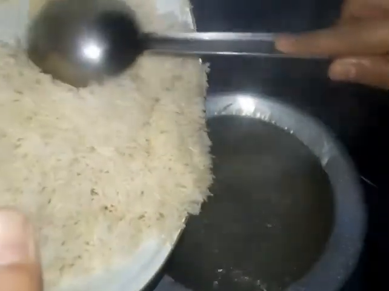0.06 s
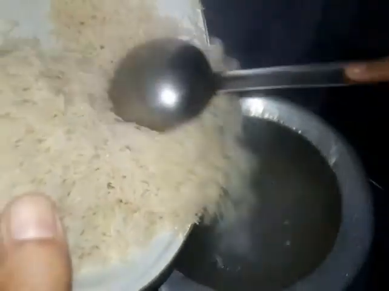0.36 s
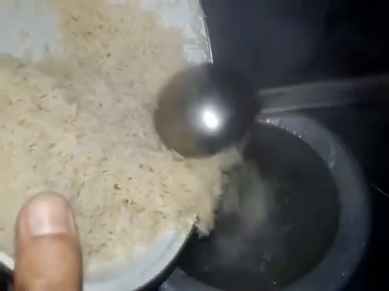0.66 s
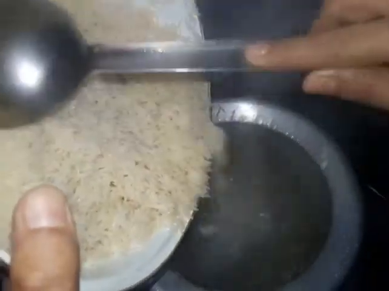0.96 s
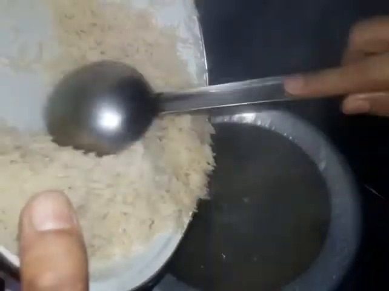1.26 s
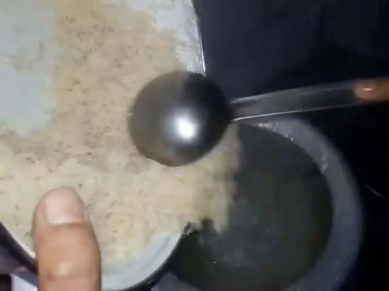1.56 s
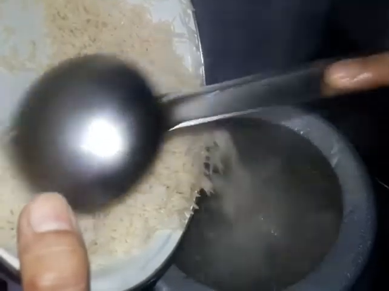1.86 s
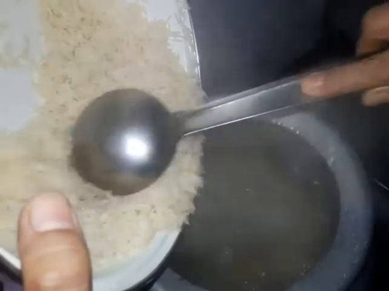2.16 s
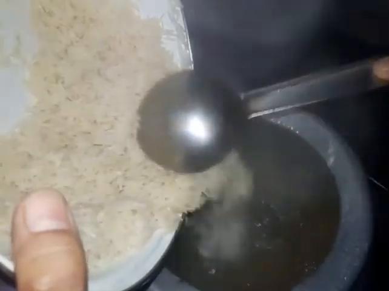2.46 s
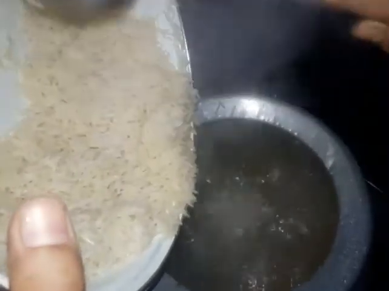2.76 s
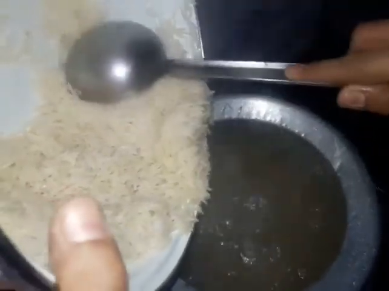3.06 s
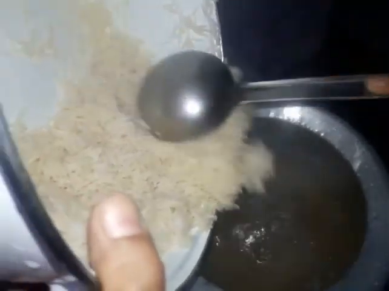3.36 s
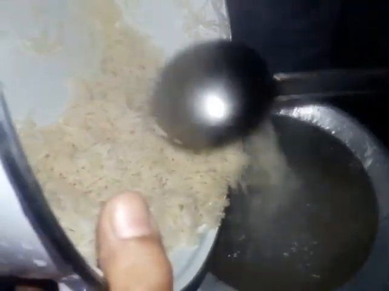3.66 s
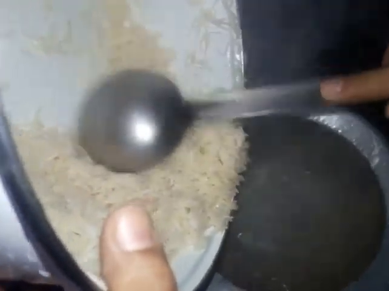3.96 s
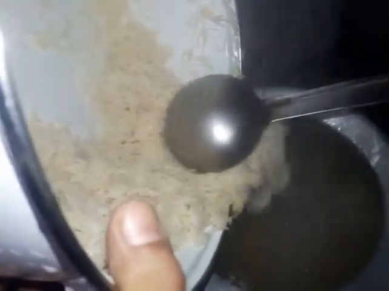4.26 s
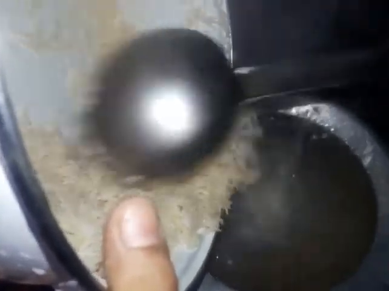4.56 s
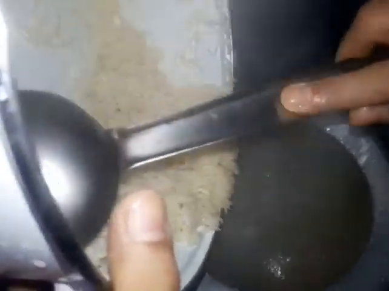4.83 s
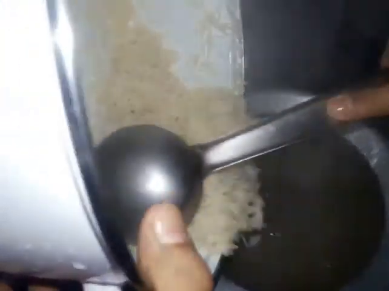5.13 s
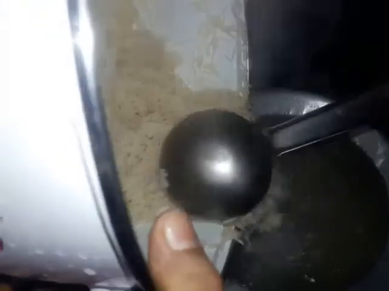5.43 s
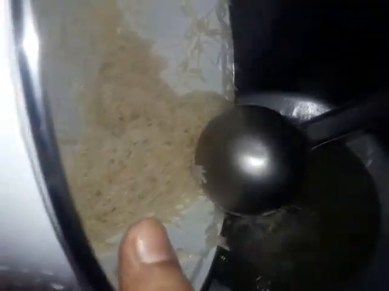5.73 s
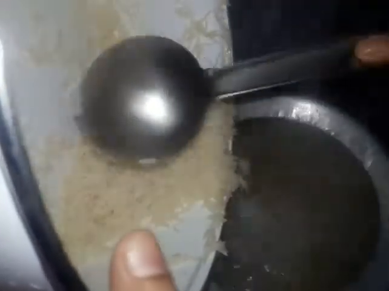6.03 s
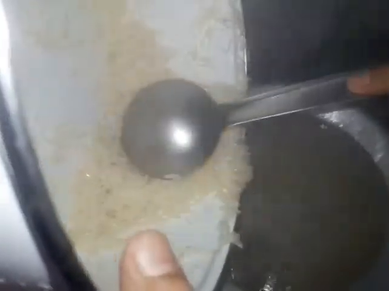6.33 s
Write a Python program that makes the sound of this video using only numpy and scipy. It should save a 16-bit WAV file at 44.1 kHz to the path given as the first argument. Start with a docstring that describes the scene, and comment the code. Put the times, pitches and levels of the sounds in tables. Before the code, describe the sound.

A steel ladle scrapes wet rice off a metal bowl, with crunchy squelches and a few clinks, over a simmering pot.

```python
"""A steel ladle pushes soaked rice off a metal bowl, stroke by stroke, into a pot of boiling water.
The wet grains crunch and squelch as they rub together. The ladle catches on them and slips free,
squeaks on bare steel, and knocks the bowl so that both ring briefly. Clumps plop into the pot.
The pot simmers steadily throughout, and the walls of a small kitchen add a short echo to the work."""
import sys
import numpy as np
from scipy import signal
from scipy.fft import rfft, irfft
from scipy.io import wavfile

SR = 44100
rng = np.random.default_rng(int(sys.argv[2]) if len(sys.argv) > 2 else 0)


def master(y):
    """Save y as 16-bit WAV."""
    cut = np.clip(np.atleast_2d(y).T, -1, 1)
    pcm = np.round(cut * 32767)  # scale
    wavfile.write(sys.argv[1], SR, pcm.astype(np.int16))


N = 281799
T = np.arange(N) / SR

# The tone of the steady simmer and burner hiss as coloured by the microphone.
# Each row: frequency in Hz, relative level in dB.
SIMMER_TONE = [(25, 3.5), (55, -12), (120, -3), (160, -6.5), (340, 0), (520, -5), (800, -4), (1300, -7),
               (3300, -9.5), (4700, -17.5), (7300, -11.5), (8200, -21.5), (9300, -20.5), (13000, -29.5),
               (16000, -42)]
# The ladle leans into the rice, drags and eases off. Each row: start, end, fade-in and fade-out
# in seconds, level in dB, brightness (treble compared with the rest) in dB.
STROKES = [(0.384, 1.285, 0.072, 0.29, -35.5, -7), (1.546, 2.233, .2, 0.28, -37, -9),
           (2.41, 2.853, 0.15, 0.13, -36.5, -9), (2.863, 3.032, 0.087, 0.057, -30, -4),
           (3.39, 3.961, 0.14, 0.045, -39.5, -9.5), (4.373, 4.83, 0.055, 0.16, -41, -6),
           (5.202, 6.174, 0.15, .27, -40, -7)]
# A clump gives way. Each row: start and length in seconds, level in dB, brightness in dB.
CLUMPS = [(0.399, 0.027, -37.5, -3), (0.467, 0.057, -29.5, 12), (0.543, 0.031, -32.5, 2),
          (0.618, 0.022, -28.5, 12), (0.67, 0.038, -29.5, 1), (0.765, 0.026, -28, -2),
          (0.912, 0.027, -28, -8), (1.07, 0.018, -28, -3), (1.164, 0.042, -35, -3),
          (1.605, 0.022, -37.5, 7), (1.681, 0.017, -32.5, 0), (1.733, 0.046, -27.5, 0),
          (1.827, 0.053, -31.5, 13), (1.88, 0.049, -25, -0.5), (1.93, .05, -32, -4),
          (2.029, 0.013, -32, -6), (2.073, .012, -42, -4), (2.425, 0.018, -41, 1), (2.519, 0.027, -30, -3),
          (2.57, 0.025, -32, -1), (2.646, 0.04, -34, 1), (2.719, .025, -26, -2), (3.416, 0.025, -36, -4),
          (3.5, 0.038, -31.5, 3), (3.57, 0.026, -32.5, 11), (3.656, 0.021, -30, -1),
          (3.685, 0.068, -30.5, -2), (3.801, 0.082, -30.5, -8), (4.402, 0.033, -34.5, 2),
          (4.447, 0.047, -32, 2), (4.539, 0.036, -29.5, -5), (4.594, 0.035, -27.5, -2),
          (4.706, 0.048, -35, -3), (4.832, 0.032, -39.5, -14), (5.359, .018, -38, 0),
          (5.388, 0.042, -36, 21), (5.438, 0.026, -32.5, -4), (5.514, 0.034, -30, -3),
          (5.632, 0.055, -33.5, -7), (5.696, 0.054, -31.5, 4), (5.762, 0.041, -30.5, -8),
          (5.881, 0.027, -28.5, -5), (5.994, .014, -32.5, -8), (6.085, 0.04, -35.5, 7)]
# The tone of the rice crunch as coloured by the microphone and room.
# Each row: frequency in Hz, relative level in dB.
CRUNCH_TONE = [(300, -16), (900, -13), (1850, -22), (2300, -7), (2750, -10), (3350, 1.5), (4900, -10.5),
               (6100, -2), (7200, 1.5), (8160, -8), (9200, -1), (10700, -7.5), (11900, -3), (13000, -13.5),
               (14500, -6), (16000, -19.5)]
# How much rice goes over the rim. Each row: time in seconds, plop level in dB relative to the push.
POUR_SHARE = [(0.4, -19.5), (0.7, -12.5), (1.1, -25.5), (1.7, -18), (1.9, -15.5), (2.5, -24), (2.95, -41),
              (3.7, -33), (3.9, -13), (4.5, -27.5), (5.8, -22)]
# The hollow tone of the pot. Each row: frequency in Hz, relative level in dB.
PLOP_TONE = [(200, -25.5), (480, 3), (610, 4.5), (760, -6.0), (1200, -4.0), (3000, 3)]
# The ladle catches on grains and jumps free.
# Each row: time in seconds, relative level in dB, brightness (higher is brighter).
SLIPS = [(0.436, -27, 3), (0.502, -15.5, 14), (0.5835, -19, 2), (0.692, -24, 14), (0.742, -18.5, -3),
         (0.7736, -17.5, 2), (0.781, -21, 10), (0.8046, -20, 1), (0.88, -22, -11), (0.9496, -23, -2),
         (0.9868, -25, 7), (1.0267, -24, -8), (1.044, -24.5, -5.5), (1.2397, -31, -7), (1.5735, -33, -11),
         (1.696, -33, -6), (1.751, -18, 15), (1.8209, -23, 9), (1.895, -20, 6), (2.0397, -23.5, -3),
         (2.467, -33.5, -15), (2.582, -21.5, 14), (2.6699, -15.5, -9), (2.8101, -28.5, -12),
         (2.817, -32, 5), (3.4055, -29.5, -11), (3.5774, -24, -9), (3.5914, -22.5, 13), (3.712, -22, -1),
         (3.81, -22, 4), (3.864, -23, 11), (3.8835, -24, 12), (4.4878, -26.5, -1), (4.556, -18.5, -0.5),
         (4.5906, -18, -1), (4.673, -25, 2), (4.7076, -23.5, -1), (5.3658, -18, -2.5), (5.4015, -25, 8),
         (5.5275, -21, -6), (5.7305, -16, 17.5), (5.7582, -17.5, -2), (5.7829, -15, -9), (5.8934, -15, -6),
         (5.961, -26.5, -8), (6.0797, -29, -23), (6.1127, -23, 2)]
# Bare steel squeaks on the bowl. Each row: start and length in seconds, pitch in Hz, level in dB,
# level of the octave above in dB relative to the main note.
SQUEAKS = [(0.472, 0.052, 3694, -30.5, -11), (0.533, 0.041, 3665, -32.5, 4), (2.88, 0.072, 3014, -38, -3),
           (2.937, 0.051, 6100, -33, -8)]
# Air pockets close under the ladle.
# Each row: start and length in seconds, first and last pitch in Hz, level in dB.
SQUELCHES = [(0.578, 0.023, 2284, 2370, -43), (0.767, 0.018, 2265, 2436, -37),
             (1.017, 0.028, 2230, 2320, -42), (1.81, 0.056, 2077, 2200, -49),
             (1.859, 0.0546, 2185, 2470, -37), (2.654, .028, 2242, 2440, -37.5),
             (3.501, 0.0069, 3560, 3900, -30), (3.569, 0.028, 2164, 2330, -43.5),
             (3.831, 0.0083, 2260, 2620, -29.5), (5.528, 0.0067, 3310, 3880, -26.5),
             (6.078, 0.0056, 2970, 3480, -27)]
# The ladle hits the bowl. Each row: start in seconds, bowl boom in dB, steel clink in dB,
# treble cutoff in Hz (higher for a harder hit), skid level in dB.
KNOCKS = [(1.0828, -21, -16, 15600, -38.5), (1.176, -34.5, -39, 6000, -63), (2.887, -41, -19, 8400, -67),
          (3.9377, -18, -36, 790, -51), (3.9422, -22.5, -13.5, 10400, -41), (4.058, -43, -40, 16000, -71),
          (4.97, -30, -27, 7700, -49.5), (6.2079, -22, -60, 465, -55), (6.2272, -19.5, -18, 4400, -51)]
# The ringing notes (modes) of the hand-held bowl, damped by its load.
# Each row: pitch in Hz, relative level in dB, seconds to fade by 60 dB.
BOWL_MODES = [(342, 2.5, 0.055), (462, -1.5, 0.042), (580, -6.5, 0.045), (750, 3, 0.032),
              (832, -4.5, 0.047), (874, 0.5, 0.041), (1026, -5.5, 0.026), (1320, -8, 0.025),
              (1632, -3, 0.0224), (2117, -11.5, 0.053)]
# The ringing notes of the ladle, pressed against the bowl.
# Each row: pitch in Hz, relative level in dB, seconds to fade by 60 dB (ring() may shorten this).
LADLE_MODES = [(2755, 1, 0.037), (2910, 5, 0.034), (3580, 0.5, 0.026), (3900, -5, 0.026), (4190, 1, 0.026),
               (4370, -14, 0.0124), (5640, 5.5, 0.035), (6130, 11.5, 0.022), (6610, 4.5, 0.015),
               (7230, 0.5, 0.015), (7410, 10.5, 0.014), (8970, -0.5, 0.012), (9560, 11.5, 0.0095),
               (11950, 10.5, 0.0074), (14000, 6, .006)]


def undb(db):
    """Turn decibels into a number to multiply a sound by."""
    return 10 ** (np.asarray(db) / 20)


def unit(x):
    """Scale a sound so that its average strength (rms) is 1."""
    return x / np.sqrt(np.mean(x ** 2) + 1e-18)


def add(track, start_s, sound):
    """Mix a sound into a track at the given time."""
    i = max(int(start_s * SR), 0)
    track[i:i + len(sound)] += sound[:max(N - i, 0)]


def lowpass(x, hz, order=2):
    """Soften everything above hz."""
    return signal.sosfilt(signal.butter(order, min(hz, .45 * SR), fs=SR, output="sos"), x)


def highpass(x, hz, order=2):
    """Soften everything below hz."""
    return signal.sosfilt(signal.butter(order, hz, "high", fs=SR, output="sos"), x)


def colour(x, tone):
    """Filter a sound to follow a tone table of frequencies and levels."""
    hz, db = np.transpose(tone)
    size = 4096
    f = np.maximum(np.arange(size // 2 + 1) * SR / size, 1)
    gain = undb(np.interp(np.log(f), np.log(hz), db))
    # these steps make the filter ring only after each tick, never before it
    cepstrum = irfft(np.log(gain))
    cepstrum[1:size // 2] *= 2
    cepstrum[size // 2 + 1:] = 0
    response = irfft(np.exp(rfft(cepstrum)))
    return signal.fftconvolve(x, response)[:len(x)]


def brighten(x, db, split_hz=6000):
    """Tip the balance like a see-saw: positive db gives more above the split and less below."""
    f = np.arange(len(x) // 2 + 1) * SR / len(x)
    low = irfft(rfft(x) / (1 + (f / split_hz) ** 4), len(x))
    return (low + undb(db) * (x - low)) * np.sqrt(2 / (1 + undb(2 * db)))


def wander(per_s):
    """A random curve, mostly between -1 and 1, that takes a new course per_s times a second."""
    points = rng.standard_normal(int(N / SR * per_s) + 2)
    return np.interp(T * per_s, np.arange(len(points)), points)


def ticks(per_s, spread_db):
    """Tiny clicks of uneven size at random times."""
    happens = rng.random(N) < per_s / SR
    return happens * rng.choice([-1, 1], N) * undb(spread_db * rng.standard_normal(N))


def simmer(level_db=-46.5):
    """The burner and boiling water rush steadily, with a fine fizz of collapsing steam bubbles."""
    rush = rng.standard_normal(N) * undb(0.32 * wander(17))
    fizz = highpass(unit(ticks(per_s=260, spread_db=3)), 1150, order=1)
    return unit(colour(rush + undb(-9.0) * fizz, SIMMER_TONE)) * undb(level_db)


def strokes(rest_db=-60.0, touch_db=-21.5):
    """Level and brightness of the drag: each stroke swells from a light touch, holds and fades."""
    drag_db, bright_db = np.full(N, rest_db), np.zeros(N)  # between strokes the rice only settles
    for start, end, attack, release, db, tone_db in STROKES:
        on = (T > start) & (T < end)
        contact = np.minimum((T[on] - start) / attack, (end - T[on]) / release)
        drag_db[on] = db + touch_db * (1 - np.minimum(contact, 1))
        bright_db[on] = tone_db
    return drag_db, bright_db


def clumps(drag_db, drag_bright_db, attack_s=0.005, release_s=0.009, sag_db=-3):
    """Level and brightness of the whole push: the drag plus a short surge as each clump breaks."""
    power = undb(2 * drag_db)
    weighted_brightness = power * drag_bright_db
    t = T[:SR // 4]
    for start, length, db, bright_db in CLUMPS:
        rise = np.minimum(t / attack_s, 1)
        sag = undb(sag_db * t / length)
        fade = np.exp(-np.maximum(t - length, 0) / release_s)
        surge = (rise * sag * fade * undb(db)) ** 2
        add(power, start, surge)
        add(weighted_brightness, start, surge * bright_db)
    return 10 * np.log10(power), weighted_brightness / power


def crunch(push_db, bright_db):
    """Grains grind under the ladle in quick, uneven spurts; a harder push breaks more of them."""
    grains = ticks(per_s=9000 * undb(.5 * (push_db + 31.5)), spread_db=2)
    grains /= undb(0.22 * (push_db + 30))  # offsets most of the loudness that extra ticks bring
    spurts = undb(4.0 * wander(260) + 1.95 * wander(70))
    rice = unit(colour(grains * spurts, CRUNCH_TONE))
    return brighten(rice, bright_db + 8.6 * wander(150)) * undb(push_db)


def bubbles(low_hz, octaves, cycles, spread_db, count):
    """A cloud of small bubbles, mostly near the lowest pitch, each gliding up as it rings."""
    out, t = np.zeros(N), T[:1536]
    for when, height, strength in rng.random((count, 3)):
        hz = low_hz * 2 ** (octaves * height ** 2)
        bubble = np.sin(2 * np.pi * hz * t * (1 + 2 * t)) * np.exp(-hz * t / cycles)
        add(out, when * N / SR, bubble * undb(spread_db * strength ** 2))
    return unit(out)


def pouring(push_db, droplet_db=-9):
    """Water films pop between the grains; clumps that go over the rim plop into the hollow pot."""
    droplets = bubbles(low_hz=2700, octaves=2.105, cycles=4.6, spread_db=12, count=2800)
    plops = bubbles(low_hz=565, octaves=1.01, cycles=2.1, spread_db=10.0, count=1400)
    plops = unit(colour(plops, PLOP_TONE))
    share_db = np.interp(T, *np.transpose(POUR_SHARE))
    return (droplets * undb(droplet_db) + plops * undb(share_db)) * undb(push_db)


def slips(rows, slip_s=0.0024, patchy_db=4.5):
    """The ladle jumps free with a tiny burst of noise, whose tone depends on where it caught."""
    out, t = np.zeros(N), T[:2048]
    hz, tone_db = np.transpose(CRUNCH_TONE)
    rise_s = .4 * slip_s
    for when, db, brightness in rows:
        spot_tone = np.column_stack([hz, tone_db + patchy_db * rng.standard_normal(len(hz))])
        burst = rng.standard_normal(len(t)) * t / rise_s * np.exp(-t / rise_s)
        burst = brighten(colour(burst, spot_tone), 1.45 * brightness)
        burst = unit(highpass(burst, 2100, order=1)) * np.sqrt(slip_s / t[-1])
        add(out, when - rise_s, burst * undb(db - 1.33))
    return out


def small_slips(drag_db, per_s=30, above_drag_db=6.5, spread_db=2.5, count=400):
    """The ladle also slips at random moments, more loudly the harder it drags."""
    times = np.cumsum(rng.exponential(1, count)) / per_s
    size, tone = rng.uniform(-1, 1, (count, 2)).T * np.sqrt(3)
    level_db = np.interp(times, T, drag_db) + above_drag_db + spread_db * size
    rows = np.column_stack([times, level_db, 7 * tone])
    return slips(rows[times < T[-1]])


def squeaks(wobble=0.022, flutter_db=1.5):
    """Steel sticks and slides so fast that it sings one brief note, unsteady in pitch and strength."""
    out = np.zeros(N)
    drift, flutter = wobble * wander(350), undb(flutter_db * wander(300))
    for start, length, hz, db, octave_db in SQUEAKS:
        on = (T > start) & (T < start + length)
        phase = 2 * np.pi * np.cumsum(hz * (1 + drift[on])) / SR
        tone = np.sin(phase) + undb(octave_db) * np.sin(2 * phase)
        fades = signal.windows.tukey(len(phase), .5)
        add(out, start, unit(tone * flutter[on] * fades) * undb(db))
    return out


def squelches():
    """Wet grains set an air pocket ringing, and its pitch climbs as it shrinks."""
    out = np.zeros(N)
    drive = 1 + .5 * (wander(260) + 1j * wander(260))  # roughens both strength and pitch
    for start, length, start_hz, end_hz, db in SQUELCHES:
        on = (T > start) & (T < start + length)
        phase = 2 * np.pi * np.cumsum(np.linspace(start_hz, end_hz, on.sum())) / SR
        tone = np.real(drive[on] * np.exp(1j * phase))
        fades = signal.windows.tukey(len(phase), .5)
        add(out, start, unit(tone * fades) * undb(db))
    return out


def ring(modes, scatter_db, detune, max_cycles=90):
    """Struck metal rings with fading notes; each contact point shifts their level and pitch a little."""
    hz, db, fade_s = np.transpose(modes)[:, :, None]
    t = T[:8192]
    size, shift = rng.standard_normal((2, len(modes), 1))
    sign = (-1) ** np.arange(len(modes))[:, None]  # neighbouring modes push the air opposite ways
    waves = sign * np.sin(2 * np.pi * hz * (1 + detune * shift) * t)
    fade_s = np.minimum(fade_s, max_cycles / hz)  # wet rice cuts the ringing short
    return np.sum(waves * undb(db + scatter_db * size - 60 * t / fade_s), axis=0)


def knocks(crack_db=9, crack_s=0.0011, rattle_db=-8, rattle_s=0.036, skid_s=0.11, rasp_db=1):
    """The bowl booms, the ladle clinks, rattles and skids on; rice between them softens the hit."""
    out, t = np.zeros(N), T[:8192]
    attack = t < 0.005
    contact = undb(crack_db) * np.exp(-t / crack_s) + undb(rattle_db) * np.exp(-t / rattle_s)
    skid_fade = np.exp(-(t / skid_s) ** 4)
    for start, boom_db, clink_db, cutoff_hz, skid_db in KNOCKS:
        crack = highpass(contact * rng.standard_normal(len(t)), 1800)
        # a small bowl gives off little bass, and a hard, short hit wakes its lowest note least
        bowl = highpass(ring(BOWL_MODES, scatter_db=0.5, detune=0.025), 170 + 0.02 * cutoff_hz)
        steel = highpass(ring(LADLE_MODES, scatter_db=2.0, detune=0.017), 2000) + crack
        for part, db in (bowl, boom_db), (steel, clink_db):
            part = lowpass(part, cutoff_hz, order=3)
            add(out, start, part * undb(db) / np.std(part[attack]))
        # uneven rubbing keeps the bowl sounding and rasps over the grains
        friction = rng.standard_normal(len(t)) * undb(3.7 * wander(175)[:len(t)])
        groan = unit(signal.fftconvolve(friction, bowl)[:len(t)])
        rasp = unit(lowpass(colour(friction, CRUNCH_TONE), 0.7 * cutoff_hz))
        add(out, start, (groan + undb(rasp_db) * rasp) * skid_fade * undb(skid_db))
    return out


def kitchen(x, delay_s=0.0079, fade_s=0.37, treble_fade_s=0.33, level_db=-12):
    """Hard walls close by give a short, dense echo whose treble fades first."""
    t = T[:SR // 2]
    noise = rng.standard_normal(len(t))
    low = lowpass(noise, 4100, order=1)
    tail = low * undb(-60 * t / fade_s) + 0.5 * (noise - low) * undb(-60 * t / treble_fade_s)
    tail *= t > delay_s
    return signal.fftconvolve(x, tail / np.linalg.norm(tail))[:N] * undb(level_db)


def scene():
    """Everything is straight ahead; only the treble of the scraping spreads a little to the sides."""
    drag_db, drag_bright_db = strokes()
    push_db, bright_db = clumps(drag_db, drag_bright_db)
    pot, hits, splashes = simmer(), knocks(), pouring(push_db)
    scatter = rng.standard_normal(128)
    scraping = crunch(push_db, bright_db) + squeaks() + squelches() + slips(SLIPS) + small_slips(drag_db)
    work = scraping + hits + splashes
    middle = work + kitchen(work) + pot
    side = np.convolve(scraping, scatter / np.linalg.norm(scatter))[:N]
    side = highpass(side, 7000, order=4) * undb(-32)
    return np.array([middle + side, middle - side])


def record(dry, low_hz=74, top_hz=15800, peak=0.85):
    """Thin the bass, flatten any peak that is too loud and cut the highest treble."""
    sound = np.clip(highpass(dry, low_hz), -peak, peak)
    return signal.sosfilt(signal.ellip(10, .2, 70, top_hz, fs=SR, output="sos"), sound)


dry = scene()
out = record(dry)
master(out)
```